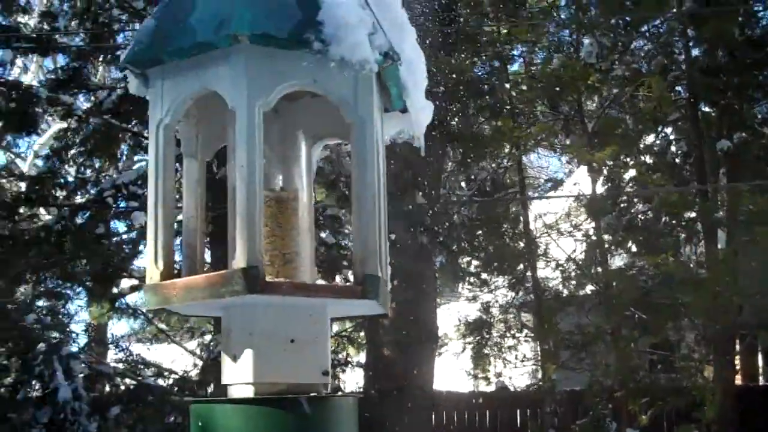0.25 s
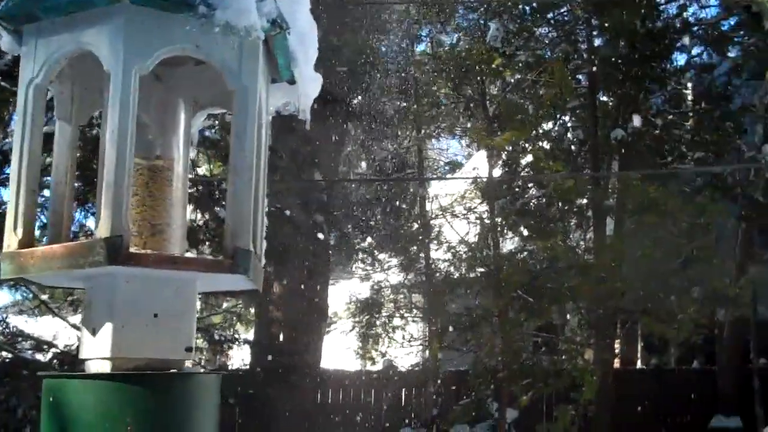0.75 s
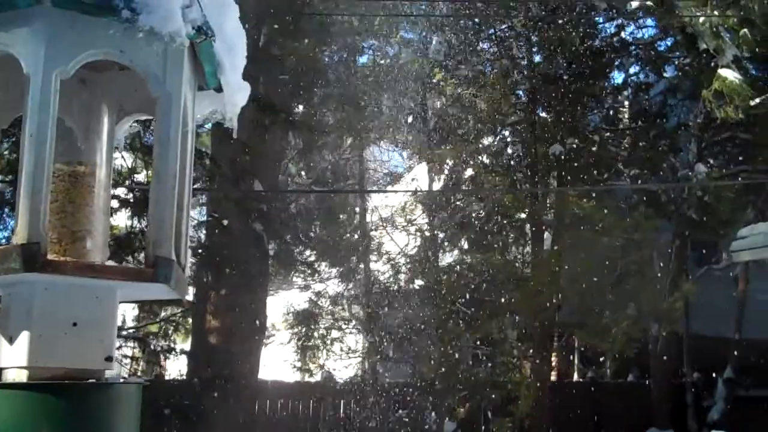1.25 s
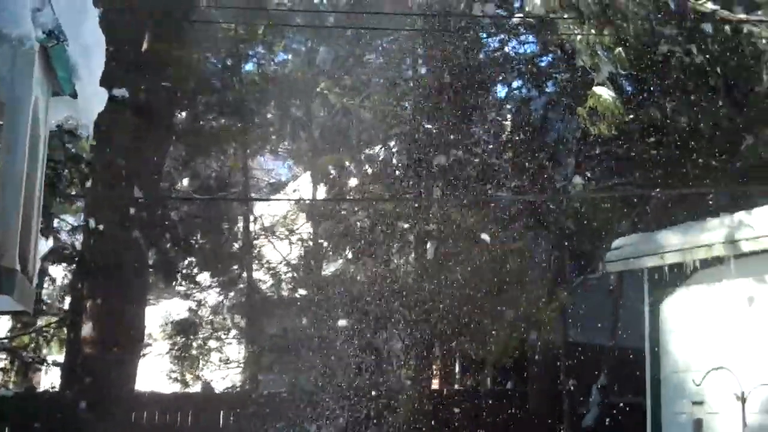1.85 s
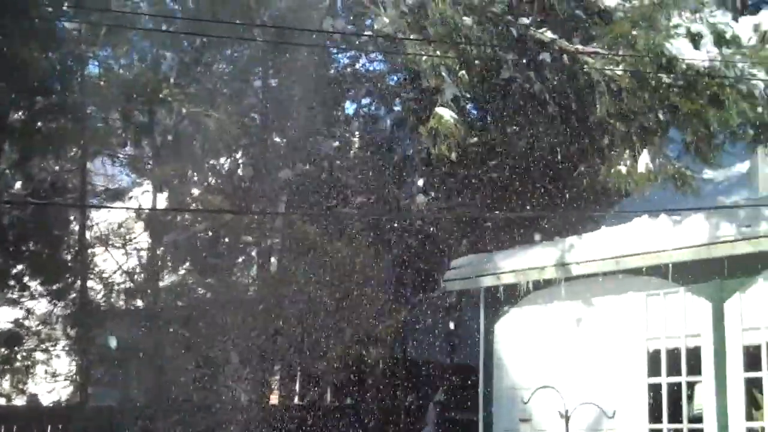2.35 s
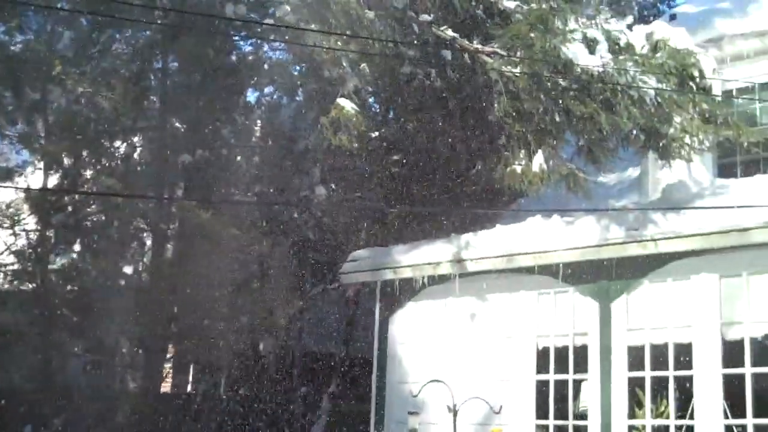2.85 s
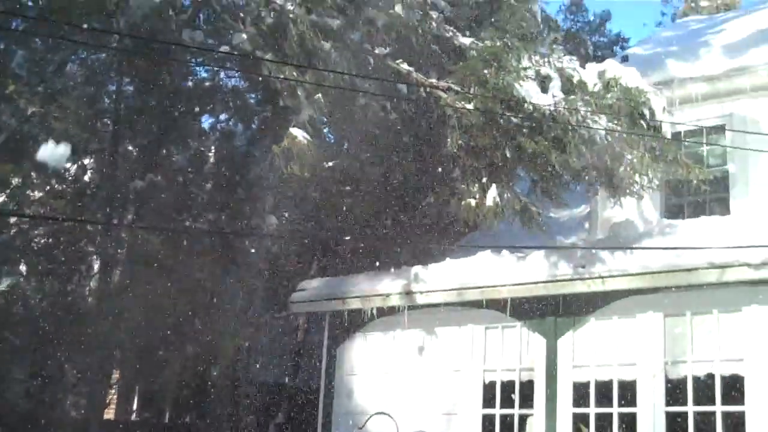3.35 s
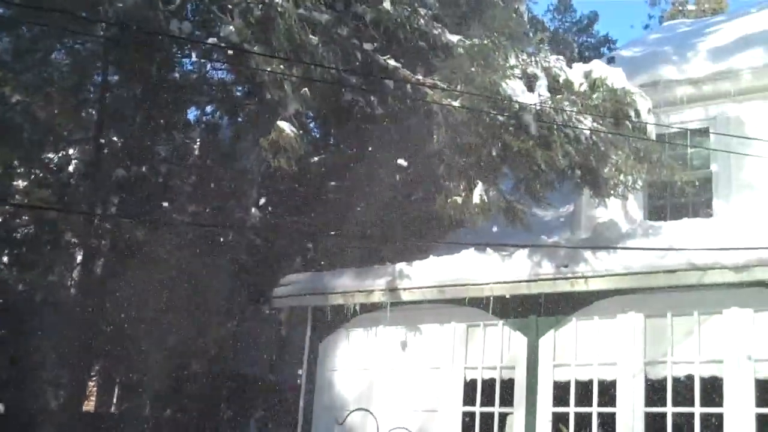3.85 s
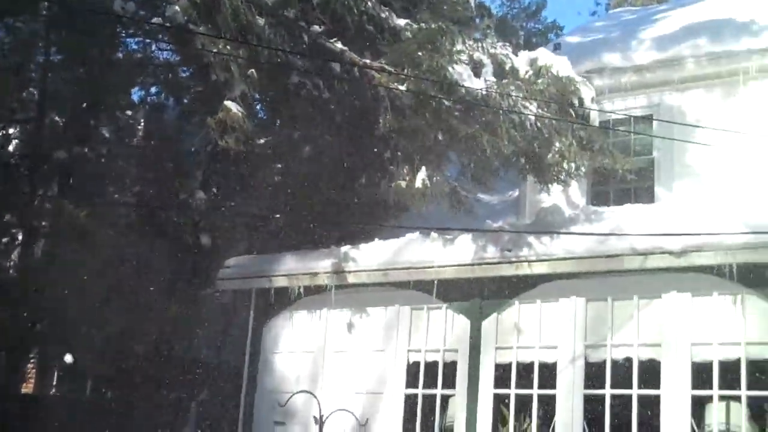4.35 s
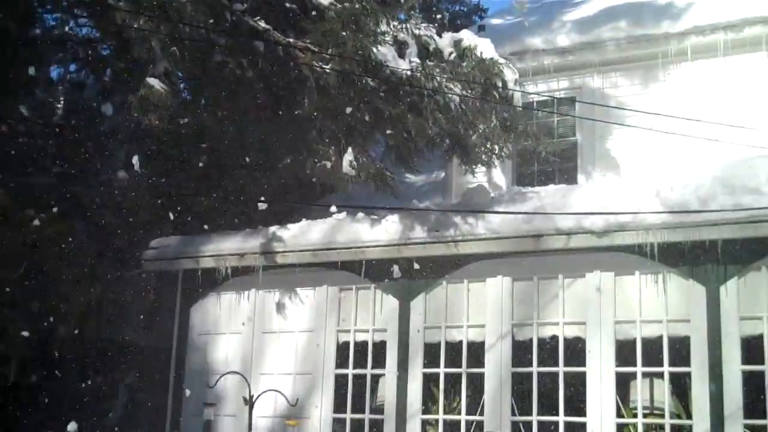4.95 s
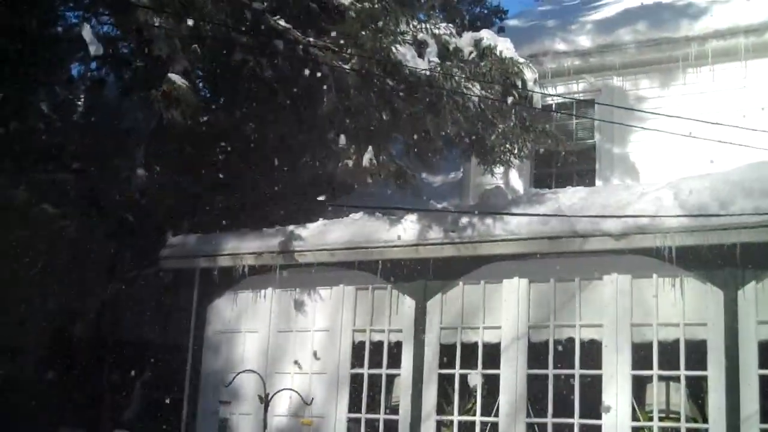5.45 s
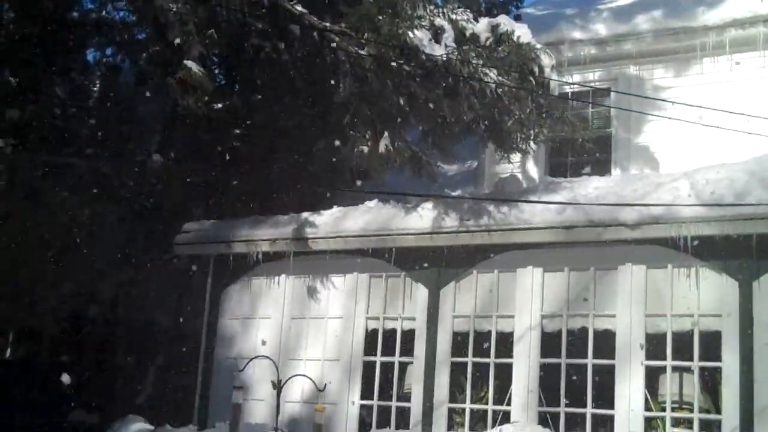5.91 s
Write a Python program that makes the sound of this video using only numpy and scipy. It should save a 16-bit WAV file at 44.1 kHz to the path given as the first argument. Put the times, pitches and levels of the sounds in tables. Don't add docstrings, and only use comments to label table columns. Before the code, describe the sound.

A snowy garden with constant hissy sifting of fine grains and scattered dry clicks all around. From about one second clumps land thickly with crisp snaps and brief sprays, mixed with low wet plops on soft ground. It calms, then a hard loud crack of snow hits near the microphone, followed by a quick rattle of smaller clumps as the sifting thins. Low far-off traffic hum lies underneath; open air, close small stereo microphone with brittle treble.

```python
import sys
import numpy as np
from scipy import signal
from scipy.fft import rfft, irfft, next_fast_len
from scipy.io import wavfile
from scipy.ndimage import uniform_filter1d

SR = 44100
rng = np.random.default_rng(int(sys.argv[2]) if len(sys.argv) > 2 else 0)


def volts_from_decibels(level):
    exponent = np.asarray(level, float) / 20
    return 10 ** exponent


def unload_audio(sound):
    columns = np.transpose(np.atleast_2d(sound))
    steps = np.round(np.clip(columns, -1, 1) * 32767)
    wavfile.write(sys.argv[1], SR, steps.astype(np.int16))


N = 272538

# freq_hz, density_db (per Hz)
HUM_SPECTRUM = [(20, -42), (50, -21), (80, -8), (105, -2.5), (135, 2.5), (165, -1), (225, 3), (300, 0.5),
                (600, -2.5), (900, -10)]
# freq_hz, density_db (per Hz)
PATTER_SPECTRUM = [(200, -19.5), (500, -5), (900, 0.5), (1300, -1), (2000, -5), (3500, -9), (6000, -10.5)]
# freq_hz, density_db (per Hz)
SIFT_SPECTRUM = [(800, -59), (2000, -5), (3500, -0.5), (5000, -2), (7000, 1), (9000, -2), (11000, 3)]
# start_s, level_db
SIFT_LEVEL = [(0.0, -42.5), (0.77, -38), (1.51, -39.5), (2.03, -38), (2.25, -39.5), (3.77, -40),
              (4.06, -36.5), (4.49, -42.5), (5.04, -41.5), (5.58, -43.5), (6.18, -44)]
PORT_LAGS = (-6, -4, -2, 0, 2, 4, 6)
# start_s, peak_db, pitch_hz, pan_db
PLOPS = [(0.532, -25, 1450, 8), (1.054, -34, 900, 5), (1.176, -32.5, 690, -1), (1.541, -29.5, 1310, -5),
         (1.751, -30.5, 786, -2), (1.779, -27.5, 1320, 8), (1.883, -26, 1240, 4), (2.16, -25, 1340, -2),
         (3.187, -18.5, 1220, 4), (3.242, -24, 2500, 9), (5.109, -29, 955, 9), (5.444, -28, 1850, 9)]
# start_s, peak_db, pitch_hz, pan_db
SLUMPS = [
    (1.114, -33, 233, 2),
]
# start_s, peak_db, pan_db
CRUMBS = [(0.07, -25, 7), (0.291, -26, 9.5), (0.465, -24, 4.5), (0.4863, -26, 13), (0.518, -26, 3.5),
          (0.611, -32, 4), (0.7078, -27, 16), (0.8755, -22, 3), (1.6726, -22, 2), (1.923, -27, -8),
          (2.0173, -25, 9), (2.2457, -27, 11), (2.523, -24, 12), (2.3556, -30, 12.5), (3.048, -23, 4.5),
          (3.751, -25.5, -1), (3.9615, -25, 6.0), (4.0084, -23, 14), (4.1834, -25, 11), (3.497, -23, 2.5),
          (5.1422, -25, 3), (5.1903, -28.5, 14), (5.249, -24.5, 0), (5.2784, -22.5, 6.0), (5.2954, -26, 14),
          (5.463, -28, 15), (5.5605, -22, 2), (5.4765, -24.5, 10), (5.8725, -25, 11), (6.1115, -21.5, 1.5)]
# start_s, peak_db, body_db (relative to the tick), pan_db
CLUMPS = [(0.0827, -18.5, -27, 16), (0.161, -22, -27, 6), (0.6, -23.5, -20, 6), (1.1395, -19, -27, 1),
          (1.1773, -20.5, -23, -3), (1.2002, -24, -14, -2), (1.4383, -22, -20, 4.0), (3.242, -36.5, 2, 6),
          (1.5353, -16, -19, -9), (1.5417, -13, -20, 1), (1.774, -24, -14, 2), (1.8567, -21.5, -24, 8),
          (1.9004, -31.5, -5, -11), (2.077, -21.5, -15, -1), (2.1605, -28, -10, 6.0),
          (2.8315, -26, -32, 12), (3.1875, -37, -1, 1.0), (4.5932, -3, -11, 6.5), (4.8216, -24, -28, 9),
          (4.9686, -32, -9, 4), (5.0605, -29, -2.5, 10), (5.0967, -13.5, -24, 5), (5.1104, -17.5, -13.5, 7),
          (5.3265, -33, -25, 14), (5.4455, -26, -3.5, 7), (5.5443, -25, -26, 9), (5.732, -25.5, -16, 15),
          (5.7657, -10, -34, 5), (5.9723, -27, -23, 3), (6.0287, -21, -24, 6)]
# start_s, spray_db, pan_db, t60_s
SPRAYS = [(0.078, -12.5, 10.0, 0.056), (0.463, -15, 11, 0.08), (0.601, -17, 6.0, 0.068),
          (1.1961, -10, 6.5, 0.11), (1.477, -17, 0, 0.16), (1.774, -9.5, 2, 0.03),
          (1.9102, -17.5, -1, 0.24), (2.074, -11, -2, 0.076), (2.5242, -16, 7, 0.076),
          (3.7466, -12.5, 8.5, 0.1), (3.8869, -13.5, 5.5, 0.16), (4.0244, -16, 10, 0.17),
          (4.5932, 4, 6.5, 0.16), (4.716, -20.5, 4, 0.15), (5.1075, -7.5, 13, 0.041),
          (5.1418, -11, 4, 0.047), (5.277, -19.5, 4, 0.13), (5.445, -17.5, 8, 0.13),
          (5.544, -22.5, 9, 0.25), (5.7832, -14, 6, 0.064), (5.717, -14, 13, 0.021), (5.0583, -7, 8, 0.021),
          (5.3239, -13, 13, 0.03), (5.4437, -6, 5.5, 0.023), (5.872, -14.5, 6, 0.057),
          (5.355, -14.5, 10, 0.053), (5.926, -16, 13, 0.03), (6.1114, -15, 7, 0.045)]
PORT_HZ = 7570, 6450
# width_hz, lift_db, rolloff_hz
PORT_SHAPES = [(994, 12.5, 9830), (975, 9, 7020)]
# freq_hz, threshold_db
DROP_THRESHOLD = [(70, -13), (200, -24), (1000, -11.5), (2600, -7), (7200, -8.5), (9500, -6), (10600, -3.5),
                  (12000, -14)]

PORT_BIAS_DB = 5.5
CRUMB_BODY_DB = -20.5


def rms_one(x):
    return x / np.sqrt(np.mean(x ** 2) + 1e-20)


def colour(x, spectrum):
    size = next_fast_len(N)
    hz, db = np.transpose(spectrum)
    bin_hz = np.arange(size // 2 + 1) * SR / size
    gain = volts_from_decibels(np.interp(np.log(bin_hz + 1), np.log(hz), db, right=-80))
    return rms_one(irfft(rfft(x, size) * gain, size)[..., :N])


def drift(rate):
    r = np.exp(-80 * np.pi * rate / SR)
    noise = rng.standard_normal(N // 40 + 2002)
    slow = signal.lfilter([1], [1, -2 * r, r * r], noise)[2000:]
    return np.interp(np.arange(N) / 40, np.arange(len(slow)), rms_one(slow))


def band(x, low_hz, high_hz):
    return signal.sosfilt(signal.butter(2, [low_hz, high_hz], "band", fs=SR, output="sos"), x)


def grains(count, per_s, spread_db):
    draw = rng.random((3, count))
    size = volts_from_decibels(spread_db * np.minimum(-np.log(draw[0] + 1e-9), 4))
    lands = draw[1] < per_s / SR
    return size * lands * np.sign(draw[2] - .5)


def add(out, sound, s, pan_db):
    i = round(s * SR)
    panned = sound * volts_from_decibels([[pan_db / 2], [-pan_db / 2]])
    out[:, i:i + sound.shape[-1]] += panned[:, :N - i]


def hum(alike=0.75, level_db=-51):
    mid, side = rng.standard_normal((2, N))
    both = np.sqrt(1 + alike) * mid + np.sqrt(1 - alike) * side * [[1], [-1]]
    return volts_from_decibels(level_db + 0.24 * drift(3.3)) * colour(both, HUM_SPECTRUM) * volts_from_decibels([[.8], [-.8]])


def breeze(breeze_db=-73.0, lumps_db=6.0):
    lumps = np.array([volts_from_decibels(lumps_db * drift(4)) for side in "LR"])
    return volts_from_decibels(breeze_db) * lumps * rms_one(band(rng.standard_normal((2, N)), 29, 94))


def all_around(per_s, spread_db, gust_db, shade_db):
    out = np.zeros((2, N))
    for lag in PORT_LAGS:
        fall = grains(N, per_s / len(PORT_LAGS), spread_db) * volts_from_decibels(gust_db * drift(17.5))
        tilt_db = shade_db * lag / max(PORT_LAGS)
        out[0] += np.roll(fall, lag) * volts_from_decibels(-tilt_db)
        out[1] += fall * volts_from_decibels(tilt_db)
    return out


def fine_snow():
    t = np.arange(N) / SR
    sift_db = np.interp(t, *np.transpose(SIFT_LEVEL))
    patter_db = -43 - 1.3559 * t + 0.056 * (sift_db - sift_db.mean())
    patter = colour(all_around(per_s=9000., spread_db=1.5, gust_db=1.2, shade_db=4.5), PATTER_SPECTRUM)
    sift = colour(all_around(per_s=12000., spread_db=0.0, gust_db=3.5, shade_db=3.0), SIFT_SPECTRUM)
    return volts_from_decibels(patter_db + 3.0) * patter * volts_from_decibels([[.8], [-.8]]) + volts_from_decibels(sift_db - 3.0) * sift


def plops(cycles=1.38):
    out, t = np.zeros((2, N)), np.arange(SR // 50) / SR
    for s, peak_db, hz, pan_db in PLOPS + SLUMPS:
        decay = volts_from_decibels(-60 * hz * t / (cycles * 2))
        swing = -np.sin(2 * np.pi * hz * t) * hz * t * decay
        add(out, volts_from_decibels(peak_db) * swing / np.abs(swing).max(), s + 0.00088, pan_db)
    return out


def landings(stray_count=80):
    when = rng.random(stray_count) * (N / SR - .1)
    size, side = rng.standard_normal((2, stray_count))
    stray_db = -33.5 + 2.5 * size.clip(-2, 1)
    strays = list(zip(when, stray_db, 9.5 + 6 * side))
    return CLUMPS + [(s, peak_db, CRUMB_BODY_DB, pan_db) for s, peak_db, pan_db in CRUMBS + strays]


def ticks():
    bright, body, t = np.zeros((2, N)), np.zeros((2, N)), np.arange(SR // 40) / SR
    for s, peak_db, body_db, pan_db in landings():
        t60 = 0.0038 * volts_from_decibels(0.13 * (body_db - CRUMB_BODY_DB))
        age = t / max(t60, .001)
        scatter = rng.standard_normal((2, len(t))) * .5 + rng.standard_normal(len(t)) * 1.3
        tick = scatter * np.sqrt(age) * volts_from_decibels(-60 * age)
        tick[:, 0] = 1.09
        add(bright, volts_from_decibels(peak_db + 9.5) * tick, s + 0.00036, pan_db - PORT_BIAS_DB)
        add(body, volts_from_decibels(peak_db + body_db + 21.0) * tick, s + 0.00045, pan_db - PORT_BIAS_DB)
    snap = band(band(bright + 1e-18, 5200, 12400), 4200, 17600)
    knock = band(body + 1e-18, 2070, 5170)
    thud = volts_from_decibels(-6.0) * band(body + 1e-18, 206, 1130)
    return snap + knock + thud


def sprays():
    out, t = np.zeros((2, N)), np.arange(SR // 3) / SR
    for s, spray_db, pan_db, t60 in SPRAYS:
        swell_s = 0.0077 * volts_from_decibels(-0.72 * (spray_db + 7.5)) * min(t60 / .07, 1)
        crumbs = np.array([grains(count=len(t), per_s=9000., spread_db=2.0) for side in "LR"])
        shape = np.minimum(t / max(swell_s, .0005), 1) * volts_from_decibels(-60 * t / max(t60, .01))
        add(out, volts_from_decibels(spray_db - 6.0) * shape * crumbs, s, pan_db - PORT_BIAS_DB)
    return band(band(out + 1e-18, 2900, 14000), 3200, 20000)


def scene():
    return hum() + breeze() + fine_snow() + plops() + ticks() + sprays()


def port(x, hz, width_hz, lift_db, rolloff_hz):
    r, w = np.exp(-np.pi * width_hz / SR), 2 * np.pi * hz / SR
    ring = signal.lfilter(np.array([1, 0, -1]) * (1 - r * r) / 2, [1, -2 * r * np.cos(w), r * r], x)
    lifted = x + (volts_from_decibels(lift_db) - 1) * ring
    return signal.sosfilt(signal.butter(3, rolloff_hz, fs=SR, output="sos"), lifted)


def gain_control(x):
    knee_db, ratio, release_db_s, attack_s = -11, .95, 180, .0025
    ramp = release_db_s * np.arange(N) / SR
    peak_db = 20 * np.log10(np.abs(x).max(axis=0) + 1e-9)
    over = ratio * np.maximum(peak_db - knee_db, 0)
    held = np.maximum.accumulate(over + ramp) - ramp
    r = np.exp(-1 / (attack_s * SR))
    return x * volts_from_decibels(-signal.lfilter([1 - r], [1, -r], held))


def drop_faint_bands(x):
    lead, hop, follows, waver_db, spared_db, calm_share = 590, 1024, .7, 2.8, 16, .9
    padded = np.pad(x, ((0, 0), (lead, 0)))
    hz, _, frames = signal.stft(padded, SR, "cosine", 2 * hop, hop)
    level = 10 * np.log10(uniform_filter1d(np.abs(frames) ** 2, size=6, axis=1) + 1e-20)
    ring = level[:, (hz > 6000) & (hz < 8000)].mean(axis=(0, 1))
    usual = np.median(ring)
    blocks = np.abs(np.pad(padded, ((0, 0), (hop // 2, 2 * hop)))[:, :len(ring) * hop])
    blocks = blocks.reshape(2, -1, hop)
    crest = blocks.max(axis=(0, 2)) / blocks.mean(axis=(0, 2)).clip(1e-9)
    bar = usual + follows * np.minimum(ring - usual, 3)
    bar = bar - spared_db * (crest > np.quantile(crest, calm_share))
    own_db = np.array([1, -1])[:, None, None]
    waver = rng.standard_normal((2, len(hz) // 16 + 1, len(ring)))
    waver = waver.repeat(16, axis=1)[:, :len(hz)]
    waver = waver_db * rms_one(uniform_filter1d(waver, size=2, axis=2))
    at_hz, under_db = np.transpose(DROP_THRESHOLD)
    kept = level > bar + waver + own_db + np.interp(hz, at_hz, under_db)[:, None]
    return signal.istft(frames * kept, SR, "cosine", 2 * hop, hop)[1][:, lead:lead + N]


def roll_off(x):
    return signal.sosfilt(signal.butter(12, 11980, fs=SR, output="sos"), x)


def record(dry):
    ported = [port(side, hz, *shape) for side, hz, shape in zip(dry, PORT_HZ, PORT_SHAPES)]
    x = gain_control(np.array(ported))
    x = .95 * np.tanh(x / .95)
    x = signal.sosfilt(signal.ellip(7, .5, 20, 11050, fs=SR, output="sos"), x)
    mix = drop_faint_bands(x)
    return roll_off(mix)


dry = scene()
out = record(dry)
unload_audio(out)
```